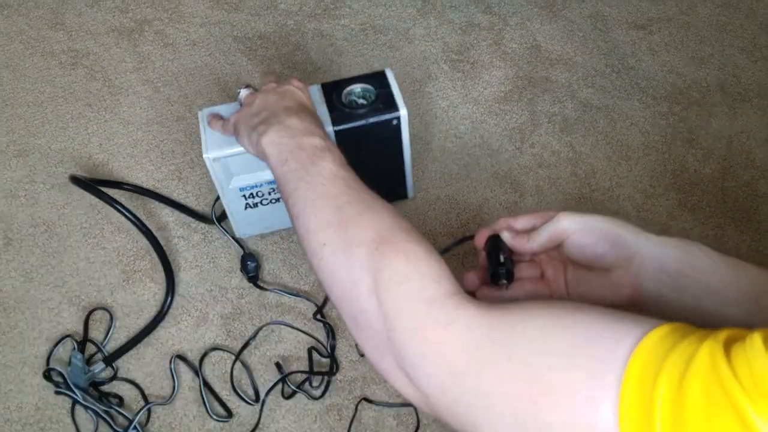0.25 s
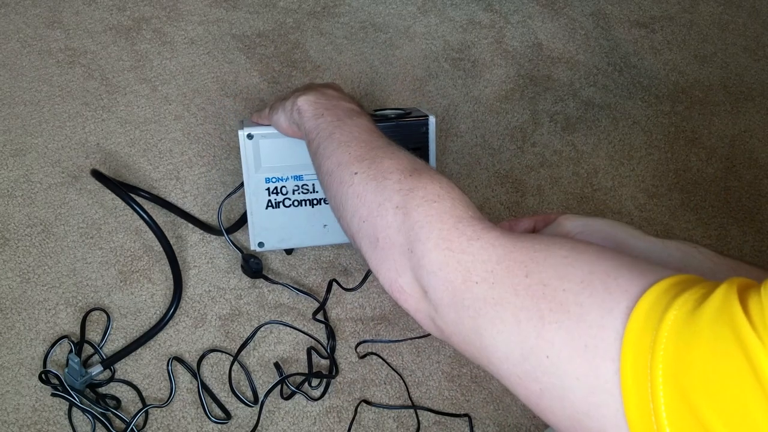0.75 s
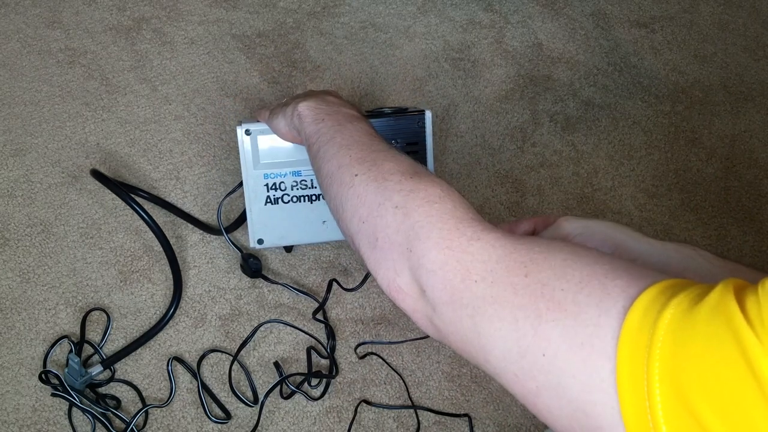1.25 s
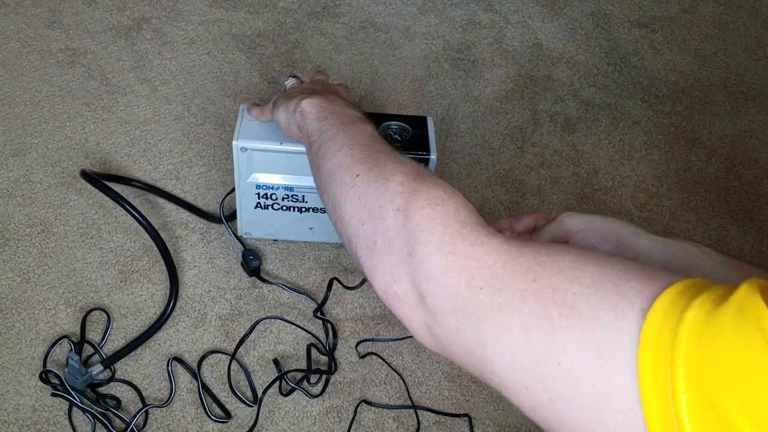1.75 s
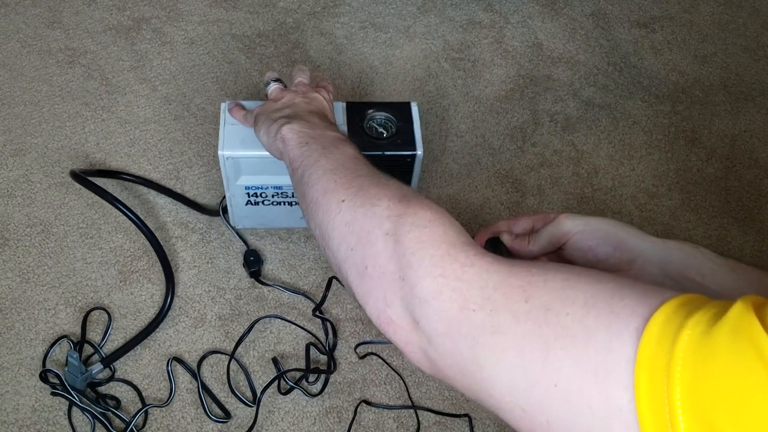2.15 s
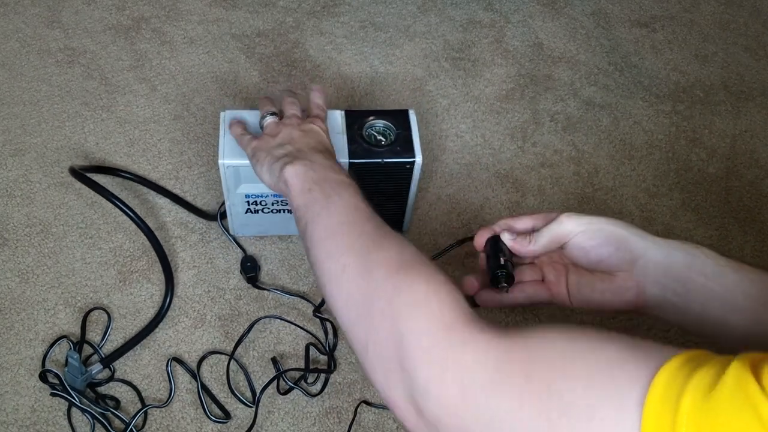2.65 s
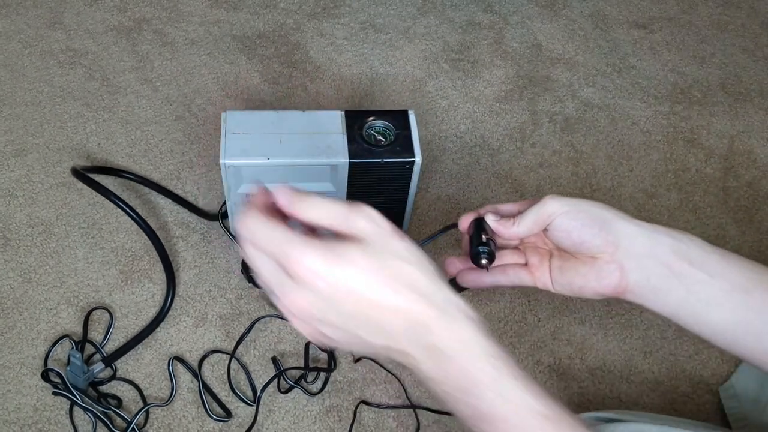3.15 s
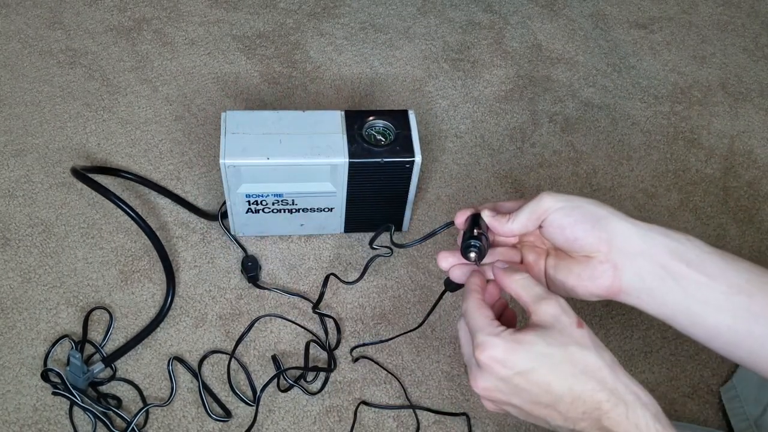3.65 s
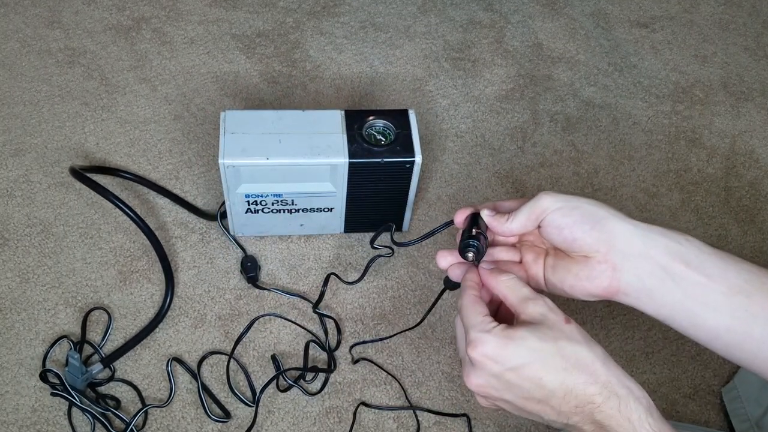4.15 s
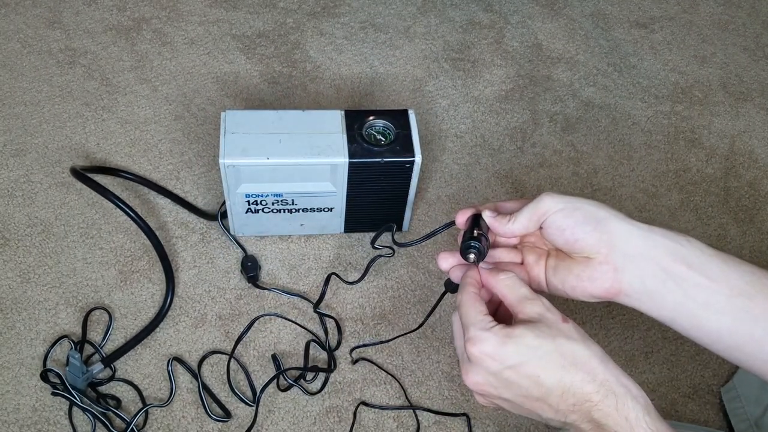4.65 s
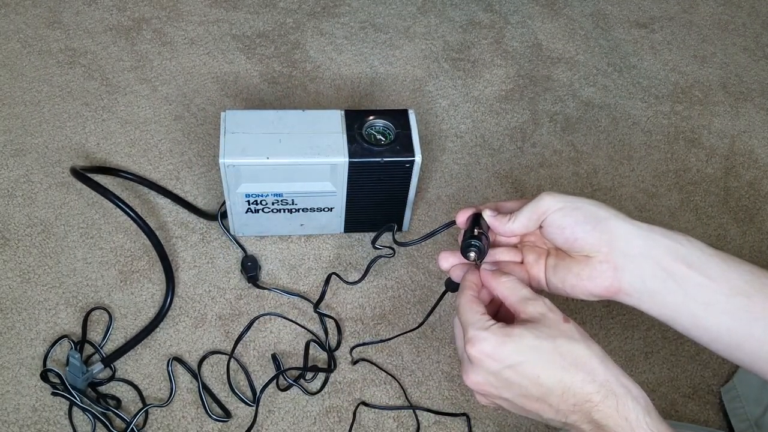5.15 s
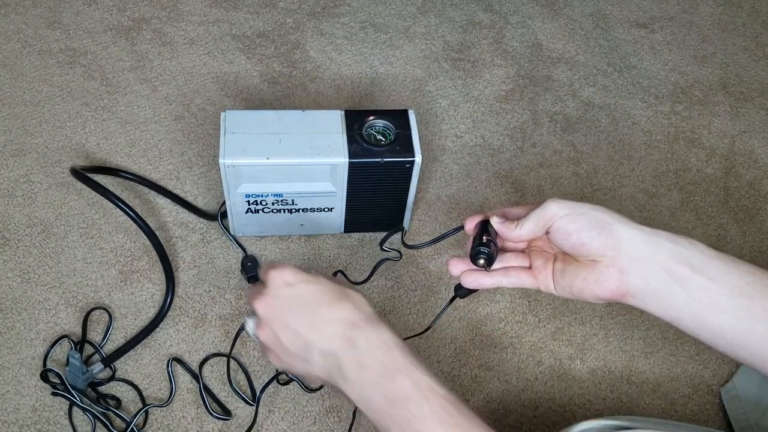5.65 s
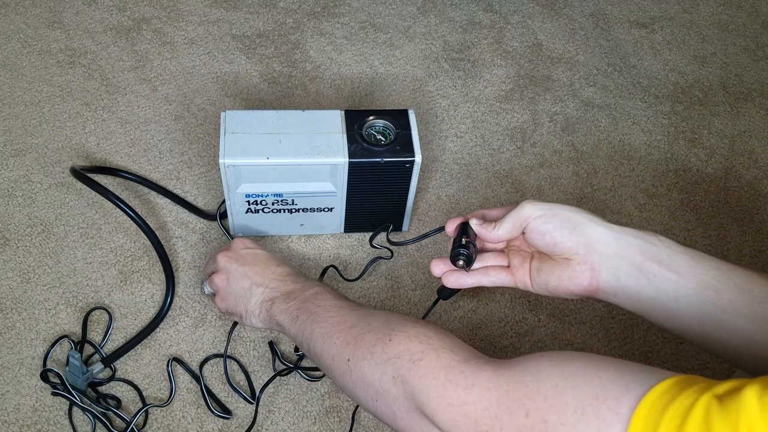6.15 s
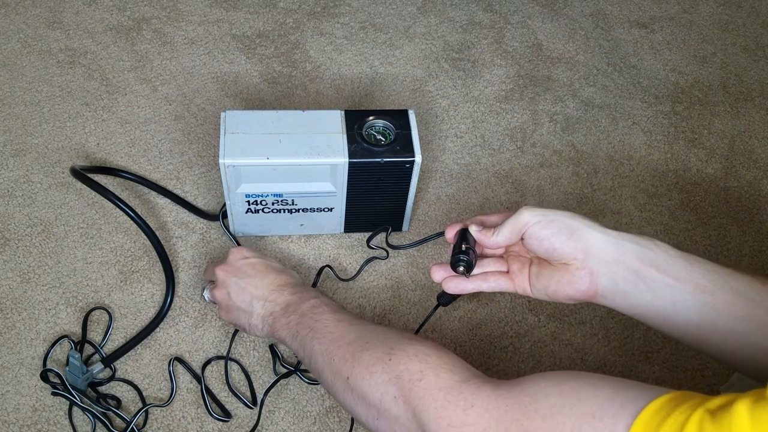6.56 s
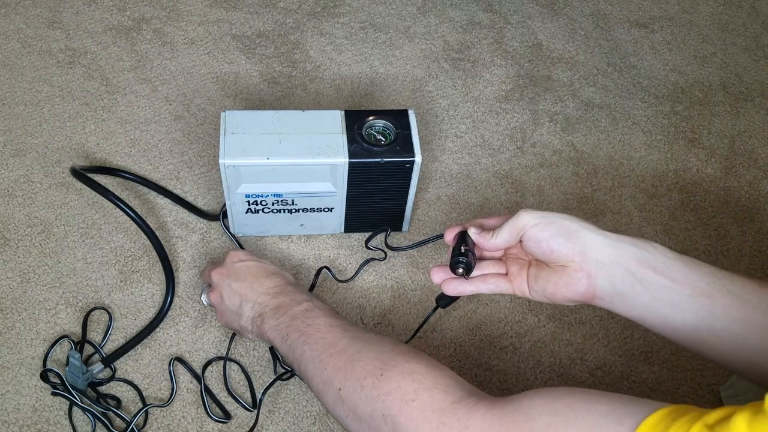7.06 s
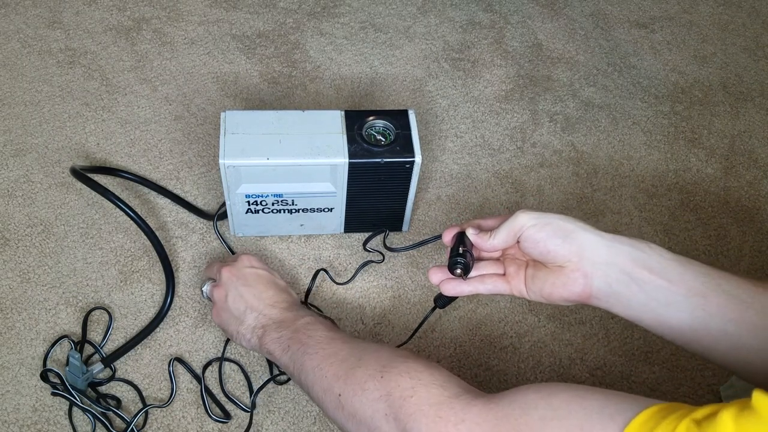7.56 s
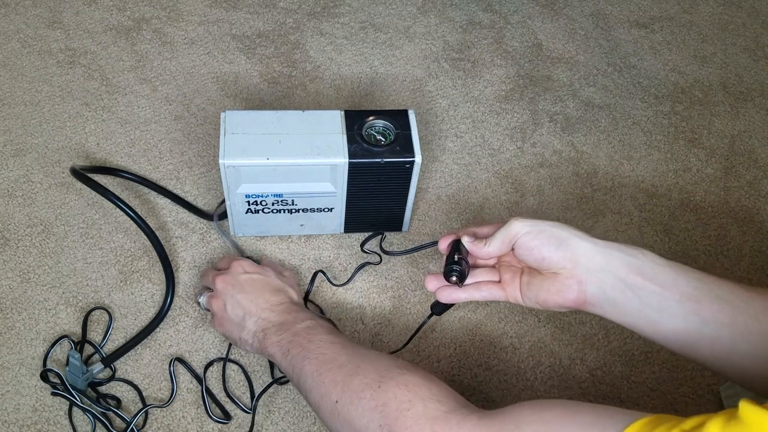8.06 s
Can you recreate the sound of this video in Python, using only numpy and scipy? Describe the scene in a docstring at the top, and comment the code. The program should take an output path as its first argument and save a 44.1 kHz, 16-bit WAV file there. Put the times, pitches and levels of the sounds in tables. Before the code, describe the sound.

In a room with a steady electrical hum and low fan-like rumble, a small air compressor close by stutters in short, regular bursts. Each one is a quick run of knocks, gear clatter and spitting air that slows and stalls. The ring of the plastic case shifts early on as it is tipped and set back. Faint ticks from the cord and two soft sleeve brushes come in among the bursts.

```python
"""A small 12 V air compressor on the carpet of a room tries to start about every 0.85 s.
Each time the motor kicks the piston through a few strokes and coasts to a stop: gears rattle in the
plastic case and air spits at the valve. Early on, a hand tips the case and sets it back, shifting its
ring. The lead is handled with a few faint ticks, a sleeve brushes twice, and a steady mains hum and
fan-like rumble lie underneath."""
import sys
import numpy as np
from scipy import signal
from scipy.fft import rfft, irfft, next_fast_len
from scipy.io import wavfile
from scipy.ndimage import uniform_filter1d

SR = 44100
rng = np.random.default_rng(int(sys.argv[2]) if len(sys.argv) > 2 else 0)


def pcm_store(signal):
    """Save signal as 16-bit PCM."""
    levels = np.round(np.clip(np.atleast_2d(signal), -1, 1) * 32767)
    wavfile.write(sys.argv[1], SR, levels.astype(np.int16).T)


N = 366471


def from_db(db):
    """Decibels to gain."""
    return 10 ** (np.asarray(db) / 20)


def rms_one(x):
    """Scale to rms 1."""
    return x / np.sqrt(np.mean(x ** 2) + 1e-20)


def at_hz(points, hz):
    """Read a curve on a log-frequency axis."""
    freqs, values = np.transpose(points)
    return np.interp(np.log(np.maximum(hz, 1)), np.log(freqs), values)


def equalise(x, curve):
    """Shape a signal with a smooth EQ curve."""
    size = next_fast_len(N + 4096)
    gain = from_db(at_hz(curve, np.fft.rfftfreq(size, 1 / SR)))
    return irfft(rfft(x, size) * gain, size)[..., :N]


def resonance(x, hz, width_hz):
    """Two-pole resonator with unity gain at its peak."""
    radius = np.exp(-np.pi * width_hz / SR)
    feedback = [1, -2 * radius * np.cos(2 * np.pi * hz / SR), radius ** 2]
    return signal.lfilter(np.array([1, 0, -1]) * (1 - radius ** 2) / 2, feedback, x + 1e-18)


def pan(x, left_db):
    """Make the left channel left_db louder than the right."""
    return x * from_db([[left_db / 2], [-left_db / 2]])


def swells(hits):
    """Envelope of hits added by power: (time [s], level [dB], rise [s], fall [s])."""
    power, t = np.zeros(N), np.arange(N) / SR
    for peak_s, db, rise_s, fall_s in hits:
        near = slice(max(int((peak_s - .05) * SR), 0), int((peak_s + .25) * SR))
        age = t[near] - peak_s
        power[near] += from_db(db) ** 2 * np.exp(-2 * np.maximum(-age / rise_s, age / fall_s))
    return np.sqrt(power)


# Stereo image, near mono in the bass and wide on top: (frequency [Hz], left-right correlation [0-1])
STEREO_IMAGE = [(100, 1), (200, 0.96), (350, 0.88), (600, 0.53), (1100, 0.36), (3000, 0.054), (8000, 0.012),
                (14000, 0.0053)]


def spread(mid, side, hz):
    """Two unrelated signals become left and right, as alike as sound of this pitch is in the room."""
    alike = at_hz(STEREO_IMAGE, hz)
    return np.sqrt((1 + alike) / 2) * mid + np.sqrt((1 - alike) / 2) * side * [[1], [-1]]


def diffuse_noise(size):
    """White noise with the room's stereo image."""
    padded = next_fast_len(size)
    mid, side = rfft(rng.standard_normal((2, padded)))
    return irfft(spread(mid, side, np.fft.rfftfreq(padded, 1 / SR)), padded)[:, :size]


# Reverb time of the room: (frequency [Hz], T60 [s])
ROOM_DECAY = [(150, 0.63), (500, 0.45), (1500, 0.27), (4000, 0.3), (14000, 0.25)]


def room(x, direct_db, tail_db):
    """Direct sound plus a diffuse tail off the walls that dies sooner in the treble."""
    size = SR * 3 // 5
    t, hz = np.arange(size) / SR, np.fft.rfftfreq(size, 1 / SR)
    centres, t60s = np.transpose(ROOM_DECAY)
    walls, tail = rfft(diffuse_noise(size)), 0
    for t60, share in zip(t60s, np.eye(len(t60s))):
        band = at_hz(np.column_stack([centres, share]), hz)
        tail = tail + irfft(walls * band, size) * from_db(-60 * t / t60)
    fade_in = np.clip(t / 0.013, 0, 1)
    response = rms_one(tail * fade_in) / np.sqrt(size)
    reverb = signal.fftconvolve(x[:1], response, axes=1)[:, :N]
    return from_db(direct_db) * x + from_db(tail_db) * reverb


# EQ of the fan-like rumble: (frequency [Hz], relative level [dB])
RUMBLE_EQ = [(20, -39), (40, -8.5), (58, -18), (75, -7.5), (140, -4.5), (200, -6), (300, -9.5), (450, -16),
             (800, -20), (1100, -18.5), (2200, -30), (4500, -43), (8000, -52.5), (15500, -41)]
# Low drones in the room tone: (frequency [Hz], nominal width [Hz], level [dB])
ROOM_DRONES = [(60.3, 4.1, -58.5), (95.44, 2.16, -51.5), (139.7, 9, -55), (198.5, 9.4, -57)]


def room_tone(hum_hz, hum_db, rumble_db):
    """The bed: mains hum, wavering drones of narrow-band noise and a broad rumble."""
    t = np.arange(N) / SR
    tones = from_db(hum_db) * rms_one(np.sin(2 * np.pi * (hum_hz * t + rng.random())))
    for hz, width_hz, db in ROOM_DRONES:
        band = resonance(rng.standard_normal(N + SR), hz, width_hz * 2)
        drone = resonance(band, hz, width_hz * 2)[SR:]   # skip the build-up
        tones = tones + from_db(db) * rms_one(drone)
    rumble = from_db(rumble_db) * rms_one(equalise(diffuse_noise(N), RUMBLE_EQ))
    return pan(tones + rumble, left_db=-1.5)


# Fader curve of a sleeve brushing as the arm swings across: (time [s], level [dB])
SLEEVE_FADER = [(2.82, -91), (2.919, -68), (3.05, -81), (3.2, -70), (3.4, -95), (5.2, -87), (5.359, -68),
                (5.54, -66.5), (5.66, -81), (5.8, -91)]
# EQ of the brushing cloth: (frequency [Hz], relative level [dB])
CLOTH_EQ = [(500, -8), (2800, 2), (5000, -2), (7000, -1.5), (8000, -5), (12000, -4), (16000, -4)]


def sleeve():
    """Soft, smooth hiss of cloth on skin."""
    level_db = np.interp(np.arange(N) / SR, *np.transpose(SLEEVE_FADER))
    return from_db(level_db) * rms_one(equalise(diffuse_noise(N), CLOTH_EQ))


# Cues for the handled lead and plug: (time [s], relative click level [dB], relative thud level [dB])
LEAD_TICKS = [(0.6209, -40.5, -59), (1.3843, -52, -47), (2.37, -65, -47.5), (8.0446, -44, -46.5),
              (8.0693, -60, -41.5), (8.087, -60, -60)]


def lead_handling(click_gain_db, thud_gain_db, thud_hz):
    """Short plastic ticks: a bright click, sharing the clatter's EQ, over a dull thud."""
    click = swells([(s, db, .0008, .004) for s, db, _ in LEAD_TICKS]) * diffuse_noise(N)
    thud = swells([(s, db, .001, .011) for s, _, db in LEAD_TICKS]) * diffuse_noise(N)
    return (from_db(click_gain_db) * equalise(click, CLATTER_EQ)
            + from_db(thud_gain_db) * resonance(thud, thud_hz, width_hz=156))


# The motor's tries to start: (time [s], travel to first stroke [turns], nominal speed [turns/s],
# free coast [s], stall after [s], jolt trim [dB], strength trim [dB], clatter trim [dB])
START_TRIES = [(-.157, 0.16, 27.76, .458, 0.29, -10, -1, -0.5),
               (.703, 0.788, 26.2, .48, 0.27, 0.5, -0.5, -0.5),
               (1.549, 0.69, 27.04, .477, 0.28, -15, 0.5, -1.5),
               (2.408, 0.31, 26.45, .468, 0.32, -3.5, -0.5, .5), (3.265, 0.34, 30.73, .429, .33, -6, -1, 0),
               (4.123, 0.74, 28.36, .423, 0.25, -11, 0, 0.5), (4.979, 0.484, 28.32, .445, .33, -1.5, -1, 1),
               (5.835, 0.35, 29.62, .453, .32, -7.5, -1, .5),
               (6.686, 0.95, 27.38, .508, .26, -15, -.5, 0.5), (7.542, .45, 25.46, .512, 0.31, -10, 1, 0)]
SPIN_UP_S, COAST_POWER, CLOCK_HZ = .02, 1.5, 4000


def crank_runs():
    """On each try the motor spins up, then friction and back pressure wear the speed down."""
    for start, lead_turns, kick_speed, coast_s, stall_s, _, strength_db, _ in START_TRIES:
        age = np.arange(0, stall_s, 1 / CLOCK_HZ)
        spin_up = np.minimum(age / SPIN_UP_S, 1)
        coast = np.maximum(1 - age / coast_s, 1e-3) ** COAST_POWER
        speed = kick_speed * spin_up * coast
        turns = np.cumsum(speed) / CLOCK_HZ - lead_turns
        yield start, strength_db, age, speed, turns


def crank_speed():
    """Turns per second through the whole scene, zero between tries."""
    t = np.arange(N) / SR
    return sum(np.interp(t, start + age, speed, left=0, right=0)
               for start, _, age, speed, _ in crank_runs())


def strokes(offset_turns, pressure_build_s=0.05):
    """Passes of a point after compression: (time [s], speed [turns/s], pressure [0-1], trim [dB])."""
    return np.array([(start + age[i], speed[i], min(age[i] / pressure_build_s, 1), strength_db)
                     for start, strength_db, age, speed, turns in crank_runs()
                     for i in np.flatnonzero(np.diff(np.floor(turns - offset_turns)))])


# Trapped air throws the stalling crank back: (time [s], relative level [dB])
AIR_REBOUNDS = [(0.972, -5), (3.545, -5), (3.587, -13.5), (6.126, -6)]
# Stroke force against crank speed; the clatter collapses first:
# (speed [turns/s], case knock gain [dB], panel ring gain [dB], clatter gain [dB])
STROKE_FORCE = [(0, -30, -40, -60), (5, -12, -13.5, -33), (8.54, -8, -8, -10), (11, -6.5, -4.5, -3.5),
                (14.9, -5.5, -4.5, -2), (20.7, -2.5, 0, 0)]
RETURN_TURNS = .46   # the piston knocks again as it turns back, this far after each stroke
FULL_SPEED, STRETCH_POWER = 21, 0.34   # strokes slower than FULL_SPEED [turns/s] are drawn out


def crank_load(speed, layer, rise_s, fall_s, unloaded_db, return_db, jolt_db, rebound_db, running_db):
    """Force envelope of one layer: first jolts, rebounds, strokes, their returns and running gears."""
    speeds, *layer_gains = np.transpose(STROKE_FORCE)
    force_db = layer_gains[["knock", "ring", "clatter"].index(layer)]
    hits = [(start, strength_db + jolt_trim_db + jolt_db, rise_s, fall_s)
            for start, *_, jolt_trim_db, strength_db, _ in START_TRIES]
    hits += [(s, db + rebound_db, rise_s, fall_s) for s, db in AIR_REBOUNDS]
    for offset_turns, offset_db in ((0, 0), (RETURN_TURNS, return_db)):
        for s, stroke_speed, pressure, db in strokes(offset_turns):
            stretch = np.clip(FULL_SPEED / max(stroke_speed, 1), 1, 2) ** STRETCH_POWER
            slack_db = unloaded_db * (1 - pressure)   # softer until the cylinder fills
            level_db = db + offset_db + slack_db + np.interp(stroke_speed, speeds, force_db)
            hits.append((s, level_db, rise_s * stretch, fall_s * stretch))
    running = from_db(running_db + np.interp(speed, speeds, force_db)) * (speed > 0)
    return np.hypot(swells(hits), uniform_filter1d(running, size=600))


def gear_teeth(speed, per_turn, slowest_speed, jitter):
    """One click per tooth: the rattle slows with the crank, down to the loose chatter of the gears."""
    play = 1 + jitter * rms_one(uniform_filter1d(rng.standard_normal(N), size=80))
    tooth_hz = per_turn * np.maximum(speed, slowest_speed) * np.maximum(play, 0)
    return np.diff(np.floor(np.cumsum(tooth_hz) / SR), prepend=0)


def clatter_trim():
    """Gain held through each try: some rattle more brightly than others."""
    held = [(start + age, db) for start, *_, db in START_TRIES for age in (0, .5)]
    return from_db(np.interp(np.arange(N) / SR, *np.transpose(held)))


# EQ of the metal clatter and valve air: (frequency [Hz], gain [dB])
CLATTER_EQ = [(300, -22), (900, 2.5), (1700, 4), (2700, 4), (3200, -3), (4500, 0), (5500, -6.5),
              (6300, -5.5), (7000, -4), (8000, -9), (9200, -3.5), (10300, -8), (12000, -4), (16000, -6)]


def clatter(teeth, speed, tooth_db, air_db, tooth_decay_s, soft_db, soft_hz):
    """The top layer: each tooth crackles and air spits at the valve; gentle contacts are duller."""
    uneven_teeth = teeth * from_db(3.0 * rng.uniform(-1, 1, N))
    fade = np.exp(-1 / (tooth_decay_s * SR))
    crackle = rms_one(signal.lfilter([1], [1, -fade], uneven_teeth + 1e-18))
    grain = np.hypot(from_db(tooth_db) * crackle, from_db(air_db))
    load = clatter_trim() * crank_load(speed, "clatter", rise_s=0.0049, fall_s=0.018, unloaded_db=-16,
                                       return_db=-14, jolt_db=-11, rebound_db=-20, running_db=-24.5)
    bright = load * grain * diffuse_noise(N)
    dull = signal.sosfilt(signal.butter(1, soft_hz, fs=SR, output="sos"), bright)
    hardness = load / (load + from_db(soft_db))
    return equalise(dull + hardness * (bright - dull), CLATTER_EQ)


# Modes of the plastic case; those with a high need for force speak only under the hardest strokes:
# (frequency [Hz], width [Hz], relative level [dB], need for force [0-1], change when tipped [dB])
CASE_MODES = [(176.5, 41, -4, 0.15, 3.5), (259.3, 17, -5, 0, 0.5), (331.6, 26, -1, 0.03, 1),
              (440.7, 44, 1, 0.45, 5), (540.5, 65, 3.5, 0, -1.5), (627, 72, 1, 0.22, -0.5),
              (740, 74, -4, 0.18, -0.5), (831, 33, -11, 0, 6), (1067, 52, -10, 0, 13),
              (1164, 60, -7, 0.2, 4), (1334, 44, 5.5, 0.02, -4.5), (1366, 41, 5, 0.47, -4.5),
              (1636, 126, -8, 0, 3), (2093, 67, -5.5, 0.2, 4), (2176, 62, -2, 0.3, 2),
              (2553, 66, -2.5, 0.4, 5), (2701, 99, -1.5, 0.16, -4.5), (3295, 35, -12.5, 0.3, -11),
              (3973, 100, -6, 0.16, -11), (5420, 170, -13, 0.74, -7), (7140, 100, -16, 0.2, -19)]
# A hand tips the case and sets it back, turning other panels upward: (time [s], tilt [0-1])
CASE_TILT = [(0, 0.45), (.6, 0.93), (1.5, 0.75), (2.1, 0)]


def case_knock(teeth, speed, knock_db, ring_db, growl, vary_db):
    """The body: loaded gears shake the case, partly as an even growl, partly as loose knocks."""
    contacts = np.flatnonzero(teeth)
    contact_s, stroke_s = contacts / SR, strokes(0)[:, 0]
    knock = from_db(knock_db) * crank_load(speed, "knock", rise_s=.006, fall_s=.017, unloaded_db=-9,
                                           return_db=-4.5, jolt_db=-5, rebound_db=-4.5, running_db=-16.5)
    ring = from_db(ring_db) * crank_load(speed, "ring", rise_s=0.0046, fall_s=.017, unloaded_db=-13.5,
                                         return_db=-8, jolt_db=-5, rebound_db=-4, running_db=-17)
    tilt = np.interp(contact_s, *np.transpose(CASE_TILT))
    body = 0
    for k, (hz, width_hz, db, need, tipped_db) in enumerate(CASE_MODES):
        load = (knock if hz < 950 else ring)[contacts]
        load = load * (2 * load / load.max()) ** need
        # no two strokes meet the case in quite the same way
        stroke_db = np.interp(contact_s, stroke_s, rng.uniform(-vary_db, vary_db, len(stroke_s)))
        load = load * from_db(db + tilt * tipped_db + stroke_db)
        mid, side = rng.uniform(-1, 1, (2, len(contacts))) * np.sqrt(3)   # loose knocks, rms 1
        force = np.zeros((2, N))
        force[:, contacts] = load * spread(mid + growl, side, hz) * np.sqrt(N / len(contacts))
        body = body + (-1) ** k * resonance(force, hz, width_hz)   # neighbours alternate in polarity
    return pan(body, left_db=-1.55)


def scene():
    """The mix: compressor and lead through the reverb, with the sleeve and room tone left dry."""
    speed = crank_speed()
    teeth = gear_teeth(speed, per_turn=30, slowest_speed=9, jitter=.25)
    body = case_knock(teeth, speed, knock_db=-13.5, ring_db=-19.5, growl=0.48, vary_db=2.975)
    top = clatter(teeth, speed, tooth_db=-37, air_db=-36, tooth_decay_s=0.0017, soft_db=-29, soft_hz=4560)
    ticks = lead_handling(click_gain_db=-9.5, thud_gain_db=18.0, thud_hz=610)
    in_room = room(body + top + ticks, direct_db=-0.5, tail_db=-4.0)
    return in_room + sleeve() + room_tone(hum_hz=120, hum_db=-43.5, rumble_db=-49)


def record(dry):
    """The left microphone is a little brighter; a steep low-pass cuts the top at 15.8 kHz."""
    treble = signal.sosfilt(signal.butter(1, 2500, "high", fs=SR, output="sos"), dry)
    heard = dry - treble + pan(treble, left_db=2.5)
    return signal.sosfilt(signal.ellip(12, .1, 80, 15800, fs=SR, output="sos"), heard)


dry = scene()
out = record(dry)
pcm_store(out)
```